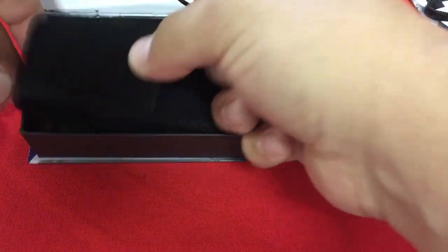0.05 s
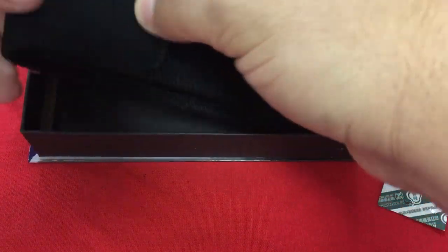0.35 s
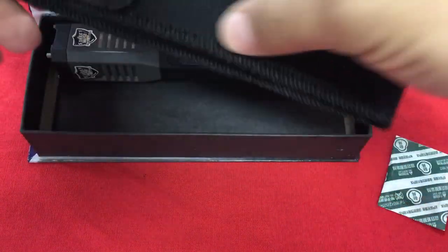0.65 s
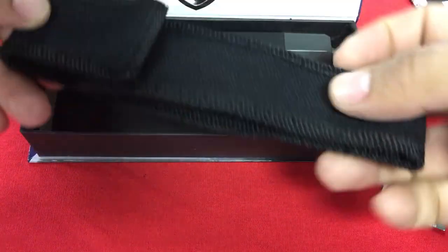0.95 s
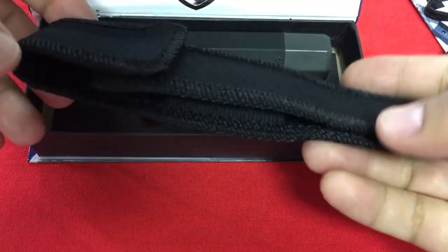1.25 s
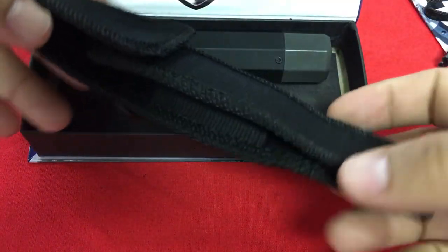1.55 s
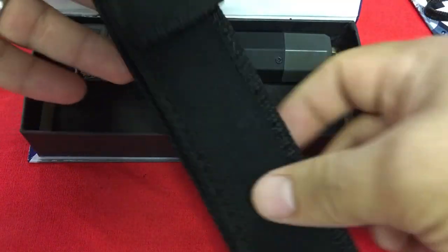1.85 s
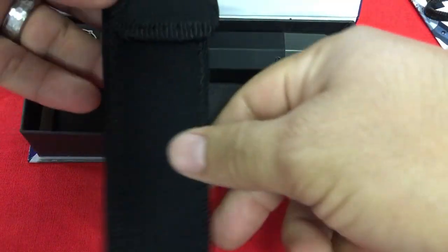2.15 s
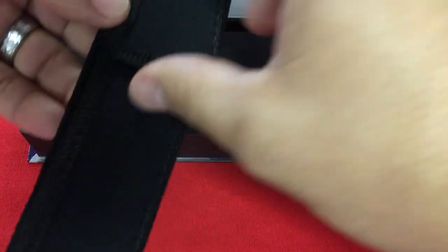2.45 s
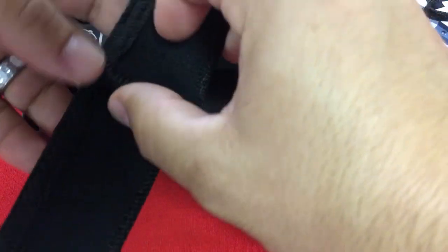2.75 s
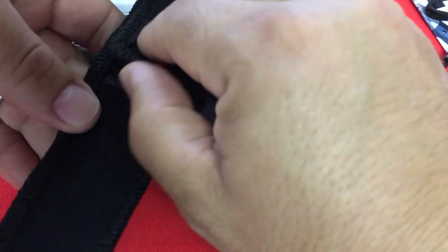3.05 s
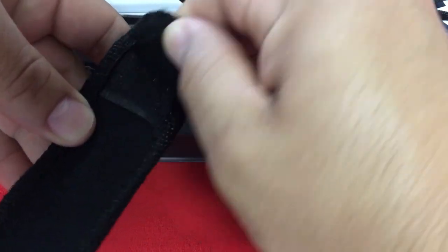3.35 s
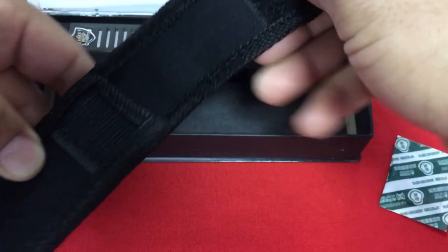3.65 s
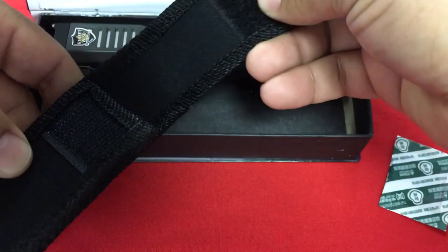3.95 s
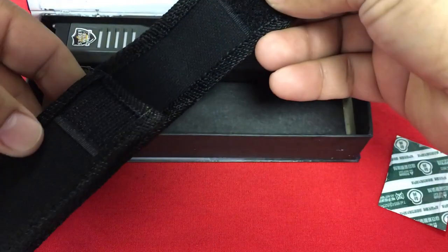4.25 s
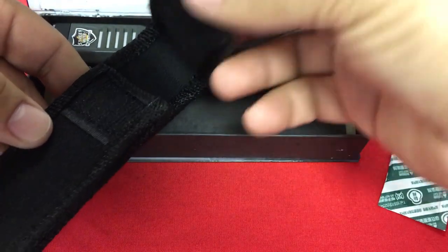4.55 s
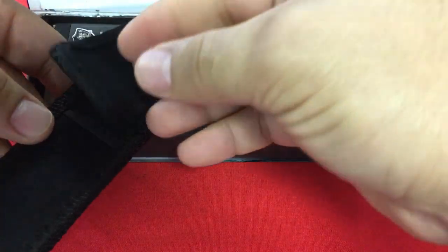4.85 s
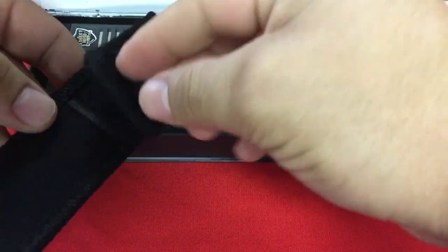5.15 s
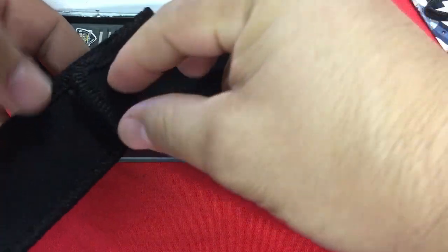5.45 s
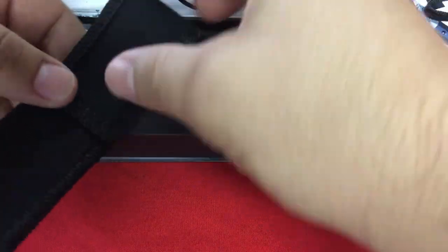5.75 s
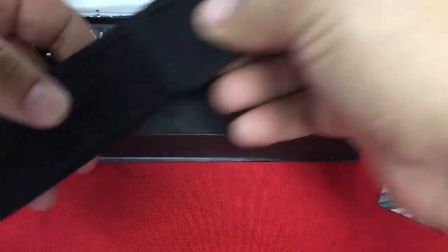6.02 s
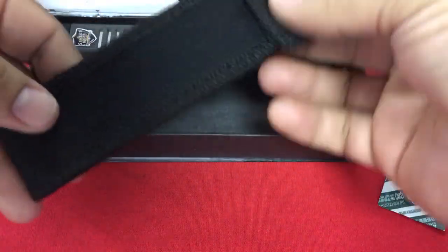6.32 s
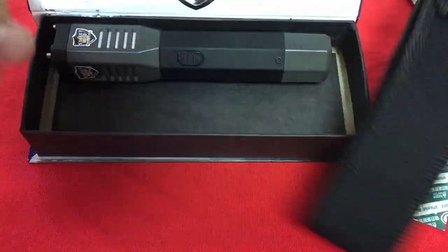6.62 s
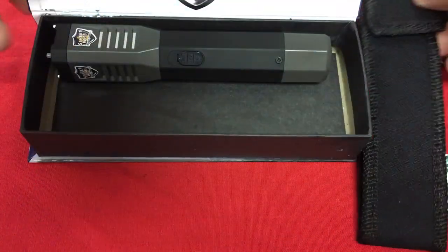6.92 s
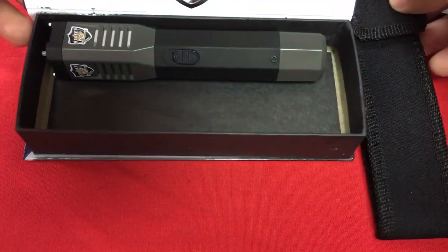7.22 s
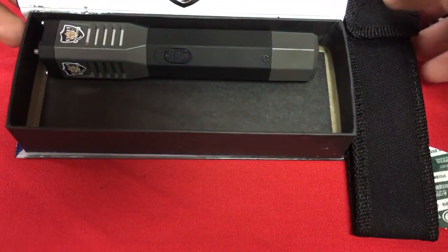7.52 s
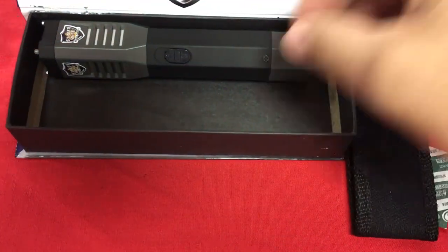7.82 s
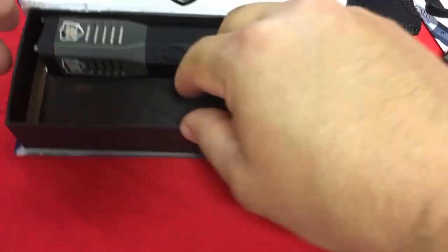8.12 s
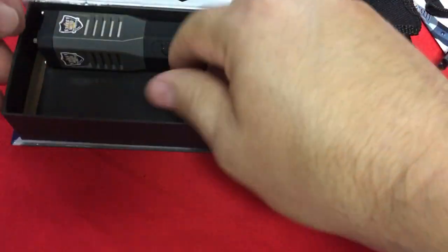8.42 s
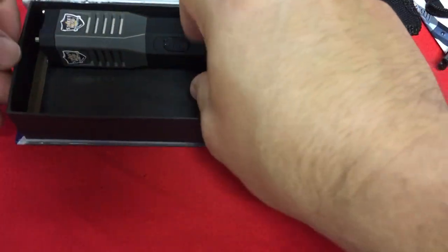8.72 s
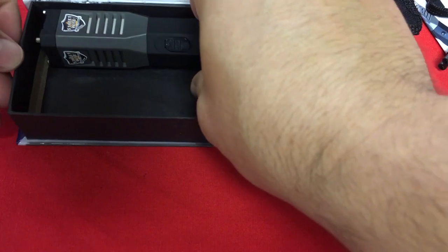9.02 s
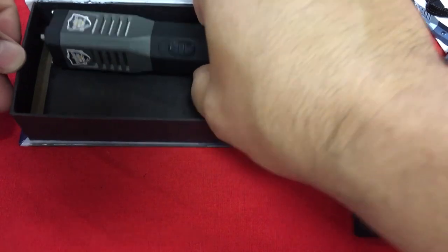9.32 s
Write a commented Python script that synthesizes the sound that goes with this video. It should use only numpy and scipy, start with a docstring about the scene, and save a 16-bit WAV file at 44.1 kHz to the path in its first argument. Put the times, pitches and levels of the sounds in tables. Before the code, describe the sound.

A nylon holster rustles in the hands, its hook-and-loop flap rips open loudly, then fingers scrape and knock in a cardboard box.

```python
"""First comes a scrape and a rustle, close by: a nylon holster is lifted from a cardboard box and
turned in the hands. Its hook-and-loop flap is ripped open, and rows of hooks let go in sharp snaps.
The flap is pressed shut, the holster is laid aside, and fingers scrape and knock in the box.
Each rub is a crowd of tiny slips; each knock sets the box ringing. All along, two motors running
at slightly different speeds hum and throb in the room."""
import sys
import numpy as np
from scipy import signal
from scipy.fft import rfft, irfft
from scipy.io import wavfile

SR = 44100
rng = np.random.default_rng(int(sys.argv[2]) if len(sys.argv) > 2 else 0)


def put_to_file(sound):
    """Save the sound as 16-bit audio at rate SR, in the file named by the first command-line argument."""
    columns = np.atleast_2d(sound).T  # one column per channel
    safe = np.clip(columns, -1, 1)
    whole_steps = np.round(safe * 32767)
    wavfile.write(sys.argv[1], SR, whole_steps.astype(np.int16))


N = 422478
TIME = np.arange(N) / SR
FREQS = np.maximum(np.fft.rfftfreq(4096, 1 / SR), 1)   # a "colour" is a dB value for each of these


def from_db(db):
    """Turn decibels into a number to multiply by."""
    return 10 ** (np.asarray(db) / 20)


def rms_one(x):
    """Scale a sound to an average power of 1."""
    return x / np.sqrt(np.mean(x ** 2) + 1e-20)


def add(out, s, sound):
    """Mix a sound in, starting at s seconds."""
    at = max(round(s * SR), 0)
    out[at:at + len(sound)] += sound[:max(N - at, 0)]


def at_time(rows, s):
    """Read a table's columns at s seconds, gliding between rows."""
    times, *columns = np.transpose(rows)
    return [np.interp(s, times, column) for column in columns]


def colour(points):
    """Join (f/Hz, level/dB) points into a curve from bass to treble."""
    hz, db = np.transpose(points)
    return np.interp(np.log(FREQS), np.log(hz), db)


def bump(hz, width_hz):
    """A hill of height 1 around a ringing pitch."""
    return 1 / (1 + (2 * (FREQS - hz) / width_hz) ** 2)


def coloured(x, db):
    """Give a sound a colour, with nothing ringing ahead of it (a minimum-phase filter)."""
    cepstrum = irfft(np.log(from_db(db)))
    half = len(cepstrum) // 2
    cepstrum[1:half] *= 2
    cepstrum[half + 1:] = 0
    response = irfft(np.exp(rfft(cepstrum)))
    return signal.fftconvolve(x, response)[:len(x)]


def ring(hz, t60):
    """One struck tone that fades by 60 dB in t60 seconds."""
    t = TIME[:SR // 4]
    return np.sin(2 * np.pi * hz * t) * from_db(-60 * t / t60)


def pressure(length, rise_s, fall_s, flutter_db, flutter_hz):
    """The force of one stroke: it builds, grips and slips unevenly, then lets go and trails off."""
    t = TIME[:SR * 2 // 3]
    grips = rng.standard_normal(len(t))
    uneven = from_db(flutter_db * np.interp(t * flutter_hz, np.arange(len(t)), grips))
    after = np.maximum(t - length, 0)
    release = np.maximum(np.exp(-after / fall_s), from_db(-6.5) * np.exp(-after / 0.032))
    return uneven * (1 - np.exp(-t / rise_s)) * release


def friction(force, colour_db, per_s, size_db):
    """Rubbing is countless tiny slips, as loud as the force; size_db makes their sizes uneven."""
    count = len(force)
    sizes = from_db(size_db * np.minimum(rng.exponential(1, count), 5))
    slips = (rng.random(count) < per_s / SR) * sizes * rng.choice([-1, 1], count)
    return force * rms_one(coloured(slips, colour_db))


def grip_colour():
    """Echoes between fingers, holster and table colour the treble differently in each grip."""
    delays_s = rng.uniform(0.0004, 0.0025, 6)
    ripple = np.sum(np.cos(2 * np.pi * delays_s[:, None] * FREQS), axis=0)
    return 1.2 * ripple / (1 + (2500 / FREQS) ** 4)


# the colour of rubbed cardboard: f/Hz, level/dB
CARDBOARD_COLOUR = [(300, -11.5), (600, -12), (1000, -6.5), (1250, -9.5), (1600, 2.5), (1850, -1.5),
                    (2100, -2), (2480, 2), (2820, -15.5), (3200, -6.5), (4000, -15.5), (6400, -19.5),
                    (15500, -31.5)]
# strokes on the box: start t/s, end t/s, level/dB, wall ringing f/Hz
BOX_SCRAPES = [(0, 0.133, -43, 1016), (0.111, 0.191, -48, 2070), (0.218, 0.26, -47.5, 1800),
               (0.521, .604, -54.5, 2300), (8.28, 8.341, -49.5, 2450), (8.362, 8.444, -53, 2420),
               (8.473, 8.657, -59, 3100), (8.705, 8.787, -59.5, 3140), (8.83, 9.05, -59, 1990),
               (9.176, 9.205, -52, 2300), (9.393, 9.555, -51.5, 2070)]


def cardboard_scrapes():
    """Holster and fingers drag on the box; each spot makes the wall ring at another pitch."""
    box_db = colour(CARDBOARD_COLOUR)
    reaching = np.interp(TIME, [8.17, 8.35], [0, 1])   # near the end, fingers shift about in the box
    out = from_db(-65.5) * friction(reaching, box_db, per_s=600, size_db=2.5)
    for start, end, db, hz in BOX_SCRAPES:
        force = pressure(end - start, rise_s=0.0035, fall_s=0.0047, flutter_db=2.5, flutter_hz=89)
        wall_db = box_db + 11.5 * bump(hz, width_hz=0.12 * hz) + grip_colour()
        add(out, start, from_db(db) * friction(force, wall_db, per_s=2400, size_db=-2.5))
    return out


# the colour of the rasping seams: f/Hz, level/dB
SEAM_COLOUR = [(300, -11.5), (600, -10), (1000, -4), (1350, -6.5), (2000, -5.5), (2500, -1), (3300, -4.5),
               (4000, -4), (5000, -9), (9000, -26)]
# the colour of the hissing weave: f/Hz, level/dB
WEAVE_COLOUR = [(2500, -11.5), (4400, -1), (5300, -3), (6400, -0.5), (8000, -2), (11500, -4), (15500, -8.5)]
# the pitch of the hollow between hand and holster, lowest while the flap hangs open: t/s, f/Hz
HOLLOW_PITCH = [(0.45, 3000), (1.1, 3240), (1.5, 2750), (2.05, 3350), (2.25, 2750), (3.05, 3780),
                (3.8, 2100), (4.48, 2067), (4.62, 3450), (6.15, 3470), (6.5, 2780)]
# nylon sliding over skin and itself: start t/s, end t/s, rasp level/dB, hiss level/dB
NYLON_STROKES = [(0.0, 0.275, -62, -61), (0.32, 0.522, -59.5, -64), (0.517, 0.748, -56.5, -59),
                 (0.739, 0.93, -58.5, -55.5), (0.943, 1.0, -60, -60), (1.049, 1.17, -60.5, -63),
                 (1.257, 1.374, -70, -84), (1.388, 1.642, -67.5, -69), (1.786, 1.94, -58, -54),
                 (1.963, 2.109, -62.5, -53), (2.103, 2.219, -63, -63.5), (2.224, 2.308, -55.5, -61.5),
                 (2.368, 2.565, -69, -81), (2.558, 2.93, -63.5, -64), (2.908, 3.019, -55.5, -58.5),
                 (3.027, 3.165, -55.5, -53), (3.609, 4.074, -63, -62.5), (4.399, 4.56, -73, -86),
                 (4.573, 4.674, -64.5, -64), (4.738, 4.9, -61, -68), (4.933, 5.023, -63, -64),
                 (5.092, 5.222, -65.5, -67), (5.239, 5.346, -62, -69), (5.737, 5.837, -51, -53),
                 (5.959, 6.046, -56, -57.5), (6.053, 6.289, -53.5, -52), (6.361, 6.442, -51.5, -57),
                 (6.448, 6.557, -57, -51.5), (6.681, 6.706, -55, -66), (6.941, 7.111, -63, -74.5),
                 (7.329, 7.598, -72, -77), (8.178, 8.3, -73, -72.5), (9.139, 9.204, -64, -66)]


def nylon_rubs():
    """Seams rasp in the hollow of the hand; the weave hisses, brighter in brisk strokes."""
    out = np.zeros(N)
    for start, end, rasp_db, hiss_db in NYLON_STROKES:
        force = pressure(end - start, rise_s=0.01, fall_s=0.015, flutter_db=2.4, flutter_hz=72)
        t = TIME[:len(force)]
        progress = np.minimum(t / (end - start), 1)
        force *= from_db(-1.5 * (2 * (progress - 0.53)) ** 2)   # weaker at both ends
        hollow_hz, = at_time(HOLLOW_PITCH, (start + end) / 2)
        brisk_db = 0.22 * (hiss_db + 58) * np.log2(np.maximum(FREQS / 7000, 1))
        octave_db = 2.5 * bump(2 * hollow_hz, 0.15 * hollow_hz)
        # a cupped hand rings more and shades the hiss
        cupped_db = np.clip(10.5 + 0.4 * (rasp_db - hiss_db), 3, 14)
        # the hand rolls between two grips, so the colour shifts within the stroke
        roll = 2 * np.pi * (rng.random() + 2.5 * t)
        for share, detune in ((np.cos(roll), 0.96), (np.sin(roll), 1.04)):
            grip_db = grip_colour()
            hollow_db = cupped_db * bump(hollow_hz * detune, 0.24 * hollow_hz)
            seam_db = colour(SEAM_COLOUR) + hollow_db + grip_db
            weave_db = colour(WEAVE_COLOUR) + brisk_db + octave_db + grip_db
            rasp = friction(force * share, seam_db, per_s=1000, size_db=0)
            hiss = friction(force * share, weave_db, per_s=4800, size_db=3)
            add(out, start, from_db(rasp_db) * rasp + from_db(hiss_db) * hiss)
    return out


# the colour of the tight strap that carries the hooks: f/Hz, level/dB
STRAP_COLOUR = [(150, -22.5), (480, -20), (640, -18), (950, -8), (1250, -7), (1500, -15), (1850, -8.5),
                (2150, -5.5), (2900, -2.5), (3600, -5), (5000, -4), (8000, -7.5), (12000, -8), (16000, -12)]


def held_holster():
    """Held nylon never quite rests, and its hooks crackle most as the flap is pressed shut."""
    held = np.interp(TIME, [0, 6.6, 7.2, 7.7], [0.68, 0.68, 0.63, 0.079])
    pressed = np.interp(TIME, [5.05, 5.4, 5.65, 5.72], [0.13, 0.94, 0.59, 0.16])
    nylon_db = np.maximum(colour(WEAVE_COLOUR), colour(SEAM_COLOUR) + 6)
    rustle = friction(held, nylon_db, per_s=1200, size_db=3)
    crackle = friction(pressed, colour(STRAP_COLOUR), per_s=190, size_db=2.5)
    return from_db(-70.5) * rustle + from_db(-67.5) * crackle


# the steady tones of the two motors: f/Hz, level/dB
MOTOR_TONES = [(58.438, -57.5), (116.866, -51.5), (120.02, -53.7), (175.3, -73), (233.73, -73),
               (360.06, -77)]
# the colour of the room's air: f/Hz, level/dB
AIR_COLOUR = [(20, -21.5), (35, 1.5), (55, 5.5), (85, 1), (130, -1.5), (175, -2), (300, -10.5), (500, -23),
              (850, -18), (1300, -29), (2100, -27), (4500, -42), (10000, -43.5), (16000, -53.5)]


def motors_and_air():
    """Two hums drift in and out of step about three times a second, over a low rush of air."""
    hum = sum(np.sqrt(2) * from_db(db) * np.cos(2 * np.pi * hz * TIME) for hz, db in MOTOR_TONES)
    air = rms_one(coloured(rng.standard_normal(N), colour(AIR_COLOUR)))
    return hum + from_db(-56) * air


# quick brushes of finger or cloth: t/s, level/dB, length t/s, centre f/Hz
QUICK_SCUFFS = [(0.043, -35, 0.0036, 4760), (.246, -46.5, 0.026, 3100), (.247, -46, 0.028, 680),
                (0.893, -43, 0.007, 1160), (1.934, -47.5, 0.0091, 2680), (2.116, -45.5, .0077, 2260),
                (3.035, -43, 0.05, 3380), (4.422, -55, 0.019, 1980), (5.133, -57, 0.014, 3600),
                (5.953, -44, 0.039, 2610), (8.179, -37.5, 0.014, 2037), (8.279, -51.5, 0.066, 655),
                (8.289, -39.5, 0.028, 2150)]


def scuffs():
    """Short slips swell fast and fade, each a puff of noise around one pitch."""
    out = np.zeros(N)
    dull_db = -10 * np.log10(1 + (FREQS / 6500) ** 2)
    for s, db, length, hz in QUICK_SCUFFS:
        age = TIME[:SR // 4] / (0.35 * length)   # 1 at the loudest moment
        band_db = -10 * np.log10(1 + (5.6 * (FREQS / hz - hz / FREQS)) ** 2)
        noise = rms_one(coloured(rng.standard_normal(len(age)), band_db + dull_db))
        swell = age ** 2 * np.exp(2 - 2 * age)
        add(out, s, from_db(db) * swell * noise)
    return out


# narrow peaks and dips in the strap's ringing: f/Hz, width f/Hz, added level/dB
STRAP_RINGING = [(2179, 61, 1), (3180, 830, 3.5), (4260, 450, 3), (4490, 95, -1), (6300, 940, 2),
                 (7600, 250, -1.5), (9100, 350, 3.5), (10990, 90, 0.5)]


def snap(bass_db, treble_db, t60):
    """A hook lets go with a click, nearby fibres spring back, and the strap colours both."""
    t = TIME[:len(FREQS)]
    fade = from_db(-60 * t / t60) + from_db(-38 - 60 * t / 0.025)
    fibres = rng.standard_normal(len(t)) * fade * (1 - np.exp(-t / 0.0002))
    burst = 2.4 * fibres / np.linalg.norm(fibres)
    burst[0] = 1   # the click
    ringing_db = sum(db * bump(hz, width_hz) for hz, width_hz, db in STRAP_RINGING)
    tilt_db = bass_db / (1 + (FREQS / 1600) ** 4) + treble_db / (1 + (4500 / FREQS) ** 4)
    sound = coloured(burst, colour(STRAP_COLOUR) + ringing_db + tilt_db)
    # keep the middle pitches equally strong, whatever the bass and treble
    middle = signal.sosfilt(signal.butter(2, [1600, 4500], "band", fs=SR, output="sos"), sound)
    return sound * np.sqrt(SR / 1000) / np.linalg.norm(middle)


# a faint lead-in tick that softens each snap's attack, then lone hooks just after it;
# compared with the snap: earliest t/s, latest t/s, level/dB
SIDE_TICKS = [(-.0025, -.0004, -24.5), (.0007, .002, -7.5), (.0025, .0095, -23)]


def add_release(out, s, db, bass_db, treble_db):
    """A faint tick softens the start of the main snap, and two lone hooks let go just after it."""
    add(out, s, from_db(db - 1) * snap(bass_db, treble_db, t60=0.0028))
    for earliest, latest, tick_db in SIDE_TICKS:
        tick_s = s + rng.uniform(earliest, latest)
        gain = from_db(db + tick_db + rng.normal(0, 2.5))
        add(out, tick_s, gain * snap(bass_db, treble_db, t60=0.007))


# single hooks and stitches catching: t/s, level/dB, extra treble level/dB
CATCHES = [(.044, -39, -33), (.799, -56, 23), (0.961, -50, 1), (1.0, -54, 10), (1.924, -45, -16),
           (2.119, -44, -10), (2.455, -47.5, -2.5), (2.578, -37, -19), (2.756, -46.5, -3), (2.814, -46, 0),
           (2.821, -42.5, -6), (2.84, -39.5, -5), (2.933, -41.5, -5), (5.142, -51.5, 1), (5.396, -51.5, -9),
           (5.611, -56, 6), (5.883, -62.5, 24), (6.331, -44, -3), (8.566, -52.5, -6), (8.695, -47, -6)]


def catching_hooks():
    """Hooks and stitches snag during handling and tick as they come free."""
    out = np.zeros(N)
    for s, db, treble_db in CATCHES:
        add_release(out, s, db, 0, treble_db)
    return out


# the tones the box rings with: f/Hz, level/dB, t/s to fade by 60 dB
BOX_TONES = [(173, 23.5, 0.062), (287, 11.5, 0.1), (430, 8, 0.023), (670, 11, 0.0061), (887, 0, 0.032),
             (1100, -18, 0.055), (1390, -6, 0.037), (1710, 8.5, 0.013), (2034, -1, 0.034), (2320, 6, 0.032),
             (3060, -2, 0.0036)]
# knocks on the box: t/s, peak level/dB, f/Hz shaken most
BOX_KNOCKS = [(.549, -37, 580), (0.555, -37, 182), (8.348, -33, 1370), (8.349, -43.5, 330),
              (8.431, -34, 1986), (9.009, -43.5, 896), (9.3204, -29.5, 1020), (9.423, -31.5, 645),
              (9.429, -38, 171)]


def box_knocks():
    """Soft bumps wake the low tones of the box, nails and hard edges the high ones."""
    out = np.zeros(N)
    for s, db, contact_hz in BOX_KNOCKS:
        sound = 0
        for k, (hz, tone_db, t60) in enumerate(BOX_TONES):
            closeness = 1 / (1 + (2.03 * np.log2(hz / contact_hz)) ** 2)
            gain = from_db(tone_db + rng.normal(0, 2.1)) * closeness
            sound += (-1) ** k * gain * ring(hz, t60)
        add(out, s, from_db(db) * sound / np.max(np.abs(sound)))
    return out


# how the snaps change colour as the flap peels: t/s, extra bass level/dB, extra treble level/dB
PEEL_COLOUR = [(3.17, -2.5, -8), (3.23, .5, -5.5), (3.36, 5, 1), (3.42, 0, -0.5), (3.47, -3, 0.5),
               (3.54, -8, 2), (3.59, -2.5, -9)]
# fits of tearing, first lone pops, then runs: start t/s, length t/s, rows of hooks, level/dB
TEARING_FITS = [(3.1696, 0.00072, 2, -13.5), (3.189, 0.0067, 1, -33), (3.2073, 0.0087, 2, -21),
                (3.2326, 0, 1, -15.5), (3.2472, 0, 1, -19), (3.2663, 0, 1, -21.5), (3.2807, 0, 1, -20),
                (3.3232, 0.0012, 1, -32.5), (3.3444, 0, 1, -22), (3.367, 0, 1, -22.5),
                (3.3711, .0212, 7, -19), (3.409, 0.0002, 3, -21), (3.4215, 0.0048, 2, -20.5),
                (3.4426, 0, 1, -17), (3.446, .0057, 2, -23.5), (3.4606, 0, 1, -21.5),
                (3.4674, 0.0084, 3, -18), (3.479, .0076, 2, -21.5), (3.5039, 0.0065, 2, -21),
                (3.522, 0.0035, 3, -17.5), (3.5505, 0, 1, -29), (3.5587, 0, 1, -21.5),
                (3.5775, 0, 1, -20.5), (3.5855, .009, 4, -20.5)]


def flap_rip():
    """The flap tears open in fits; in each, rows of hooks let go at nearly even steps."""
    out = np.zeros(N)
    jitter_s, spread_db = 0.00043, 1.66
    for start, length, rows, db in TEARING_FITS:
        for progress in np.linspace(0, 1, rows):
            edge_db = -7.5 * (2 * progress - 1) ** 2 * (rows > 4)   # long runs peak in the middle
            late, harder = rng.standard_normal(2) * (progress > 0)
            s = start + progress * length + jitter_s * late
            bass_db, treble_db = at_time(PEEL_COLOUR, s)
            add_release(out, s, db + edge_db + spread_db * harder, bass_db, treble_db)
    return out


# jerks of the flap: t/s, level/dB, f/Hz, t/s to fade by 60 dB
FLAP_JERKS = [(3.524, -33, 273.4, 0.03), (3.586, -33.5, 315, 0.035), (3.592, -35.5, 207, 0.069)]


def flap_thumps():
    """The flap jerks free with short, low thumps."""
    out = np.zeros(N)
    for s, db, hz, t60 in FLAP_JERKS:
        add(out, s, from_db(db) * ring(hz, t60))
    return out


def room(x, echo_db, t60):
    """A softly furnished room adds a faint, short, dull echo."""
    t = TIME[:SR // 2]
    tail = rng.standard_normal(len(t)) * from_db(-60 * t / t60) * (t > 0.004)
    tail = coloured(tail, -10 * np.log10(1 + (FREQS / 6000) ** 2))
    return x + from_db(echo_db) * signal.fftconvolve(x, tail / np.linalg.norm(tail))[:N]


def scene():
    """All the handling sounds in the room, over the hum."""
    rubbing = cardboard_scrapes() + nylon_rubs() + held_holster() + scuffs()
    hits = catching_hooks() + box_knocks() + flap_rip() + flap_thumps()
    return (room(rubbing + hits, echo_db=-25, t60=0.13) + motors_and_air())[None]


def record(dry):
    """Round off the loudest peaks and cut away the very highest treble."""
    ceiling, cutoff_hz = 0.7, 16200
    rounded = ceiling * np.tanh(dry / ceiling)
    return signal.sosfilt(signal.ellip(10, 0.3, 80, cutoff_hz, fs=SR, output="sos"), rounded)


dry = scene()
out = record(dry)
put_to_file(out)
```